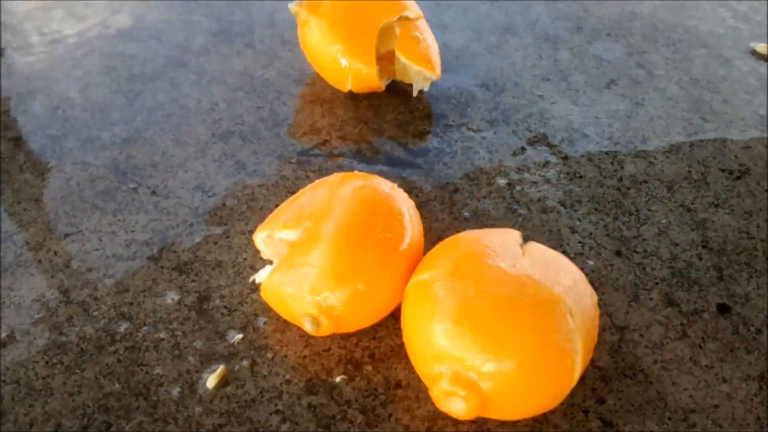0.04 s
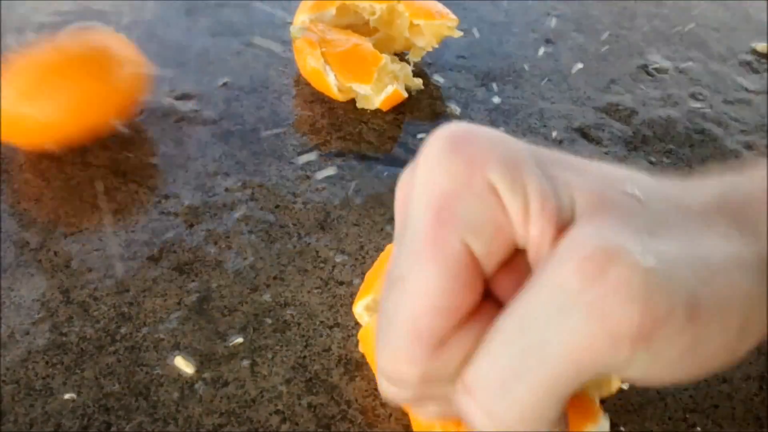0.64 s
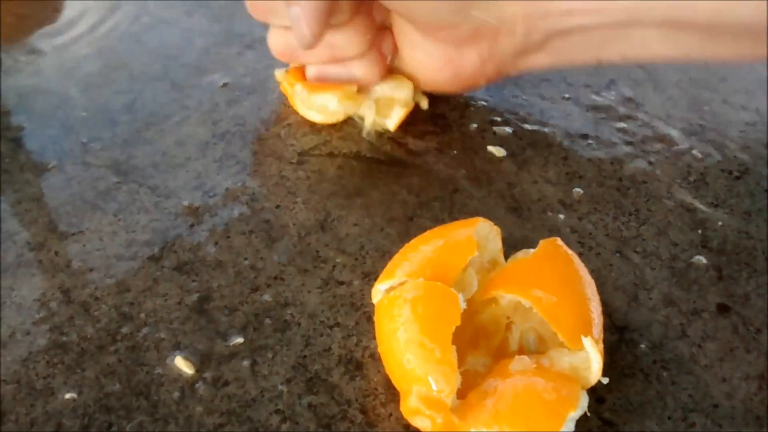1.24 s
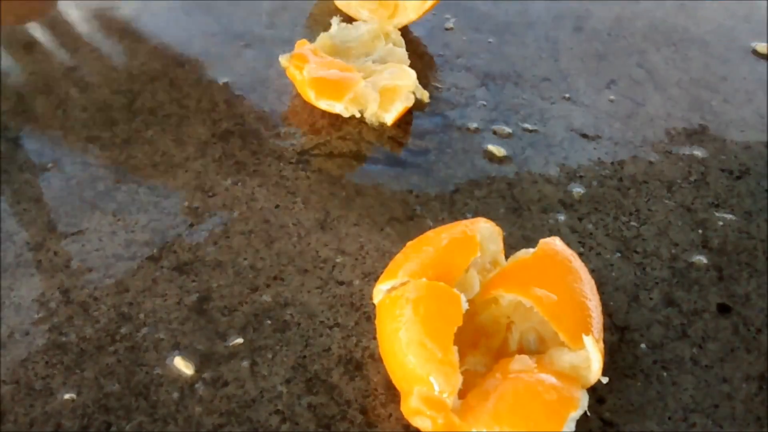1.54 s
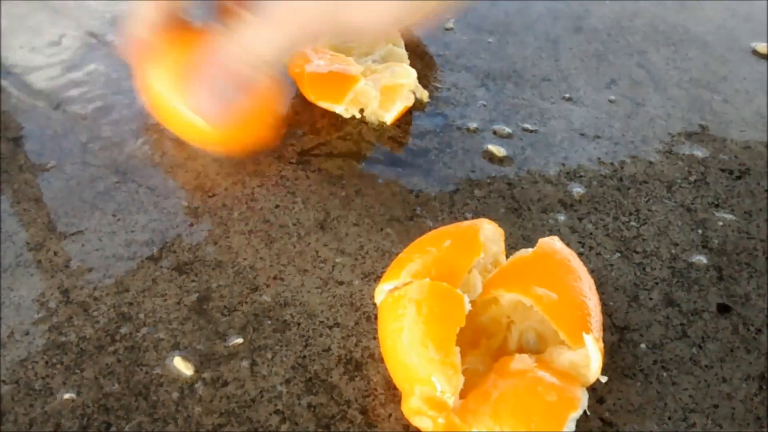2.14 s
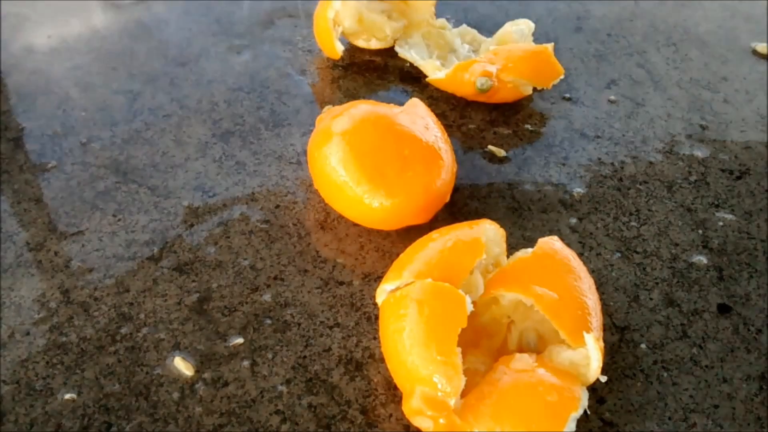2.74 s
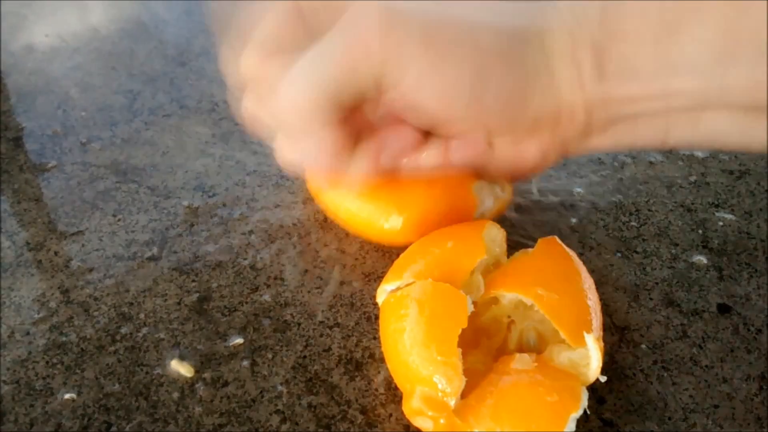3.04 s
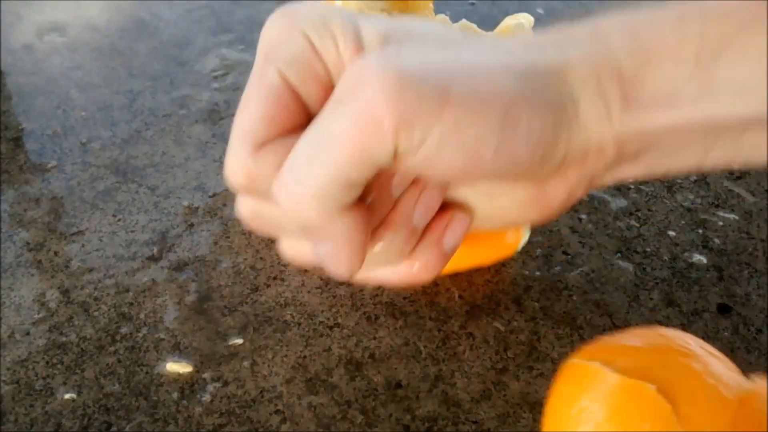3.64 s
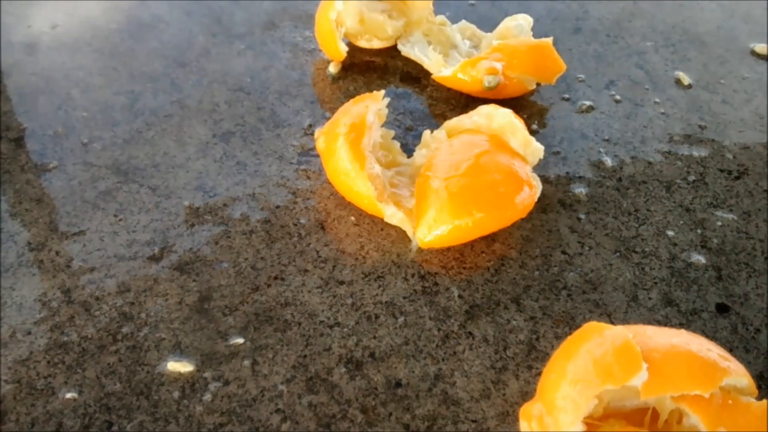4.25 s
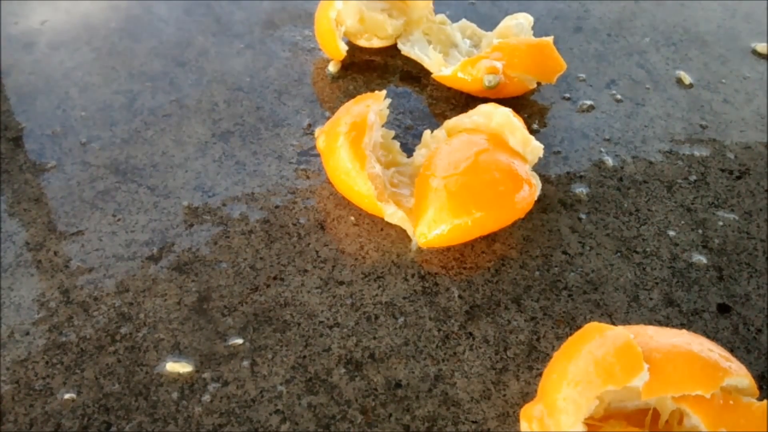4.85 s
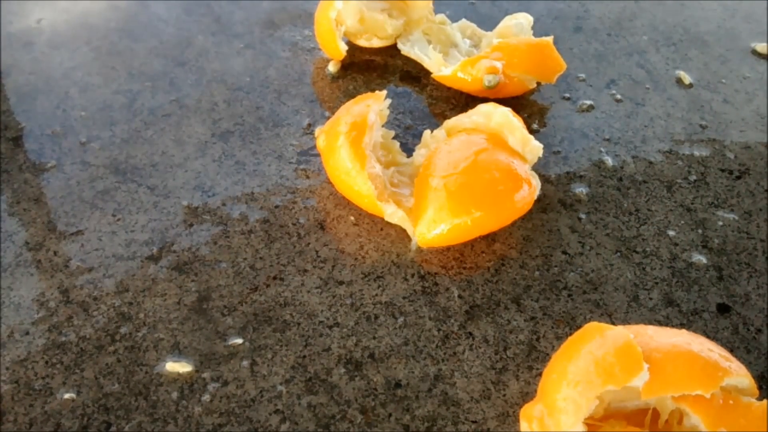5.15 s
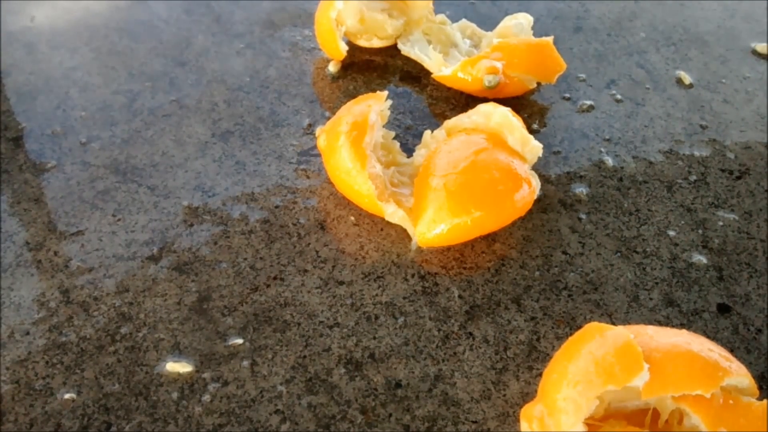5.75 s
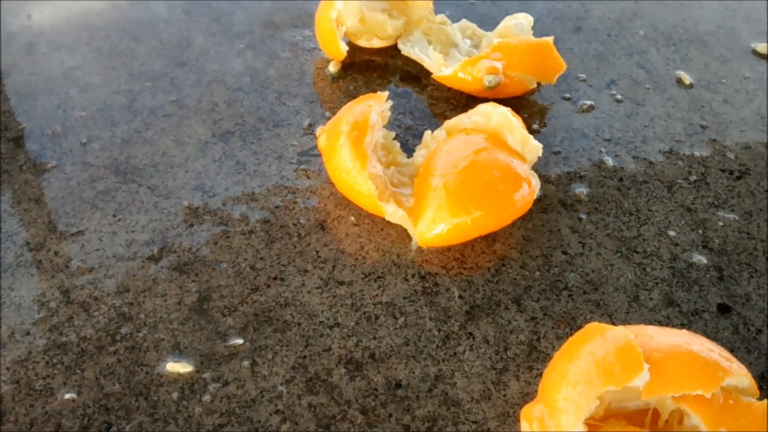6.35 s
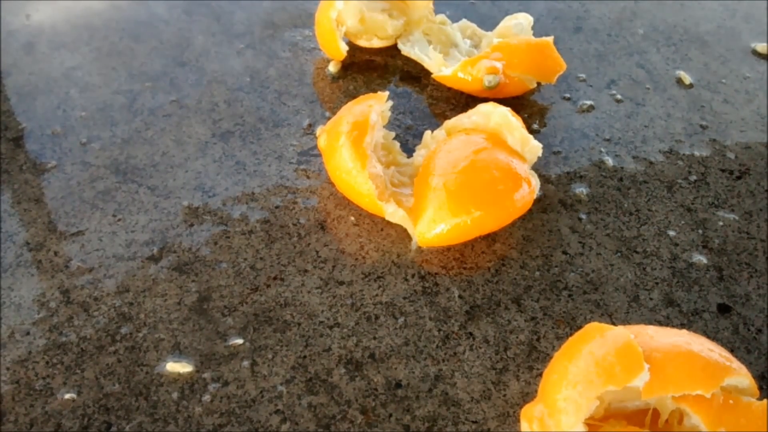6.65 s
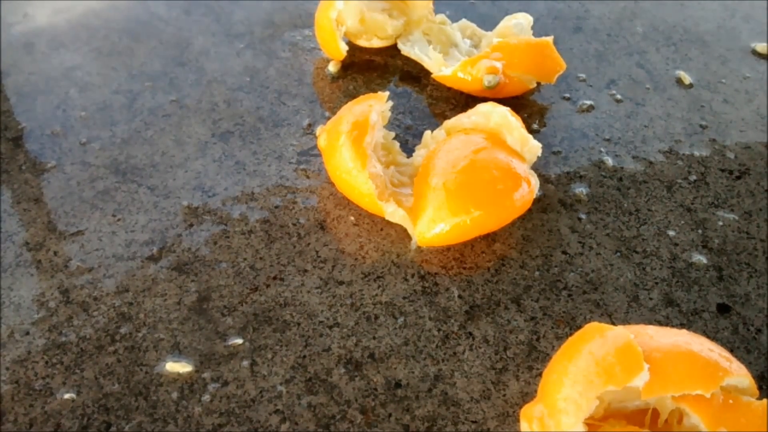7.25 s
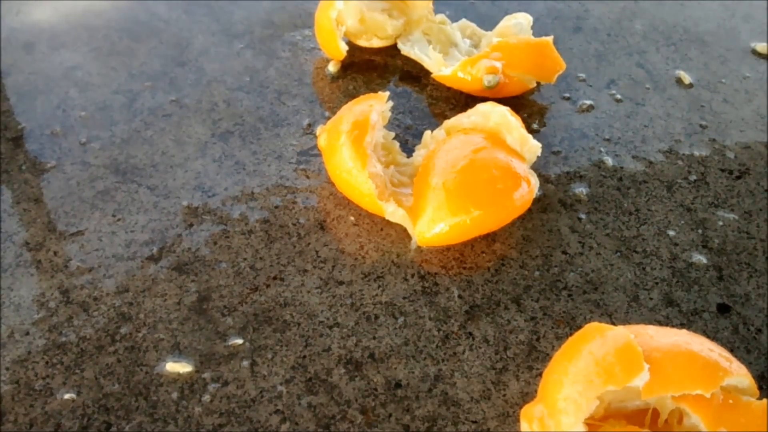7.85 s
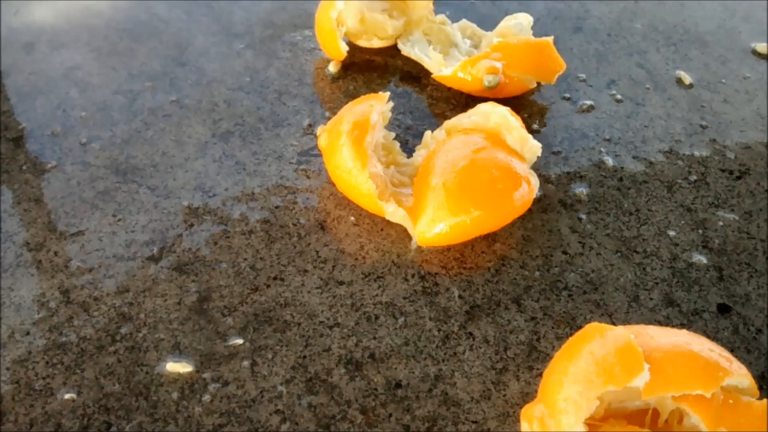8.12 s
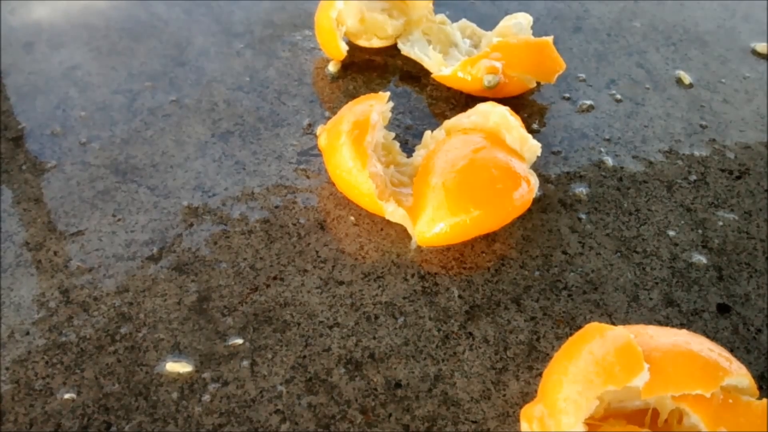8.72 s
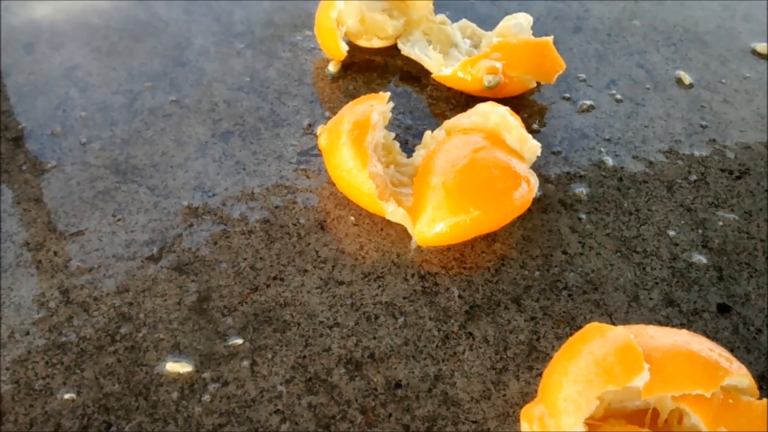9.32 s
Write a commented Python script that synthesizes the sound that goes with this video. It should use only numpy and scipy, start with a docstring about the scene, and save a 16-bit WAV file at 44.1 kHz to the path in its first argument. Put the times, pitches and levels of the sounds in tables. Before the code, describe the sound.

A bare fist smashes oranges on wet pavement, close to the microphone. Three short, sharp, wet hits land at about 0.2, 0.6 and 1.3 seconds, each with a snap of peel, a squelch of pulp and a few drops of juice. A sleeve swishes softly around 2 to 2.7 seconds as distant traffic swells into a low, steady wash. The loudest splat comes at 3.2 seconds and another at 3.7, both with juice squirting and pattering down. A very faint, thin, high squeal follows from 4 to nearly 5 seconds. Wind, light at first, then takes over, buffeting the microphone with low rumbles and thumps, strongest from 5.3 to 6 seconds, from 7.4 to 8.6, and again just after 9. A small, distant bird chirps very faintly around 6 and 9 seconds.

```python
"""Smashing lemons on wet pavement

A bare fist comes down five times, close to a phone: peel snaps, pulp squelches, juice patters down.
A sleeve swishes as the hand sets down the next fruit. Far traffic swells behind, something squeals
thinly, a small bird chirps, and gusts buffet the microphones more and more.
The hardest hits make the phone's limiter duck everything for a moment."""
import sys
import numpy as np
from scipy import signal
from scipy.fft import rfft, irfft, next_fast_len
from scipy.io import wavfile
from scipy.ndimage import uniform_filter1d, map_coordinates

SR = 44100
rng = np.random.default_rng(int(sys.argv[2]) if len(sys.argv) > 2 else 0)


def transcribe(u):
    """Save the signal u as a 16-bit wav file named by the first command-line argument.

    u: samples, shape (n,) or (channels, n), limited to [-1, 1]; the rate is SR.
    q: integer samples, one column per channel.
    """
    v = np.clip(np.atleast_2d(u).T, -1, 1)
    q = np.round(v * 32767).astype(np.int16)
    wavfile.write(sys.argv[1], SR, q)


N = 413658
TIME = np.arange(N) / SR


def from_db(db):
    """Decibels to gain."""
    return 10 ** (np.asarray(db) / 20)


def unit_rms(x):
    """Scale to rms 1."""
    return x / np.sqrt(np.mean(x ** 2) + 1e-20)


def automation(points):
    """Join (seconds, value) points into a curve over the whole scene."""
    return np.interp(TIME, *np.transpose(points))


def swell(peak_s, width_s):
    """A bell-shaped rise and fall, 1 on top."""
    return np.exp(-np.minimum(((TIME - peak_s) / width_s) ** 2, 20))


def held(start, length, attack_s=0.013, release_share=0.22):
    """Come in quickly, hold at 1, fade over the last part."""
    fade_in = (TIME - start) / attack_s
    fade_out = (start + length - TIME) / (release_share * length)
    return np.clip(np.minimum(fade_in, fade_out), 0, 1)


def at_hz(points, hz):
    """Read a curve on a log-frequency axis."""
    point_hz, value = np.transpose(points)
    return np.interp(np.log(np.maximum(hz, 1)), np.log(point_hz), value)


def band(x, low_hz, high_hz, order=2):
    """Causal band-pass."""
    edges = np.clip([low_hz, high_hz], 10, .45 * SR)
    return signal.sosfilt(signal.butter(order, edges, "band", fs=SR, output="sos"), x)


def resonate(x, hz, q):
    """A damped resonance with gain 1 on top."""
    return signal.lfilter(*signal.iirpeak(min(hz, SR / 3), max(q, 1), fs=SR), x)


def drift(per_s, size=N, step=12):
    """A smooth random wobble, rms 1."""
    knots = rng.standard_normal(int(size / SR * per_s) + 4)
    at = np.arange(0, size + step, step)
    curve = map_coordinates(knots, [at * per_s / SR], order=3, mode="nearest")
    return np.interp(np.arange(size), at, unit_rms(curve))


def narrow_band(hz, per_s):
    """Noise gathered closely around a pitch."""
    phase = 2 * np.pi * np.cumsum(hz * np.ones(N)) / SR
    return drift(per_s) * np.cos(phase) + drift(per_s) * np.sin(phase)


def stereo(two, coherence):
    """Mix two unrelated signals as mid and side: coherence 1 is mono, 0 wide, -1 out of phase."""
    mid = np.sqrt(1 + coherence) * two[0]
    side = np.sqrt(1 - coherence) * two[1]
    return np.array([mid + side, mid - side]) / np.sqrt(2)


def noise(spectrum, coherence):
    """Stereo noise at rms 1, shaped by (Hz, dB) and (Hz, coherence) points."""
    size = next_fast_len(N)
    hz = np.arange(size // 2 + 1) * SR / size
    white = stereo(rfft(rng.standard_normal((2, size))), at_hz(coherence, hz))
    return unit_rms(irfft(white * from_db(at_hz(spectrum, hz)), size)[:, :N])


def noise_burst(t, t60):
    """Wide white noise that falls 60 dB in t60 seconds."""
    return rng.standard_normal((2, len(t))) * from_db(-60 * t / t60)


def grains(size, per_s, spread_db, coherence):
    """Random clicks of uneven size: juice cells bursting, droplets landing."""
    strength = from_db(spread_db * np.minimum(rng.exponential(1, (2, size)), 3))
    polarity = rng.choice([-1, 1], (2, size))
    fires = rng.random((2, size)) < per_s / SR
    return stereo(unit_rms(strength * polarity * fires), coherence) + 1e-18


def add(out, start_s, sound, pan_db=0):
    """Mix a sound in; pan is left minus right, in dB."""
    start = round(start_s * SR)
    part = (sound * from_db([[pan_db / 2], [-pan_db / 2]]))[:, :N - start]
    out[:, start:start + part.shape[1]] += part


# The five hits. Each row: burst time, squeeze before it and juice decay (t60), all in seconds,
# thud level in dB, pulp level in dB, pulp pitch in Hz, juice level in dB, juice pitch in Hz,
# then fizz level, spray level and pan, all in dB.
FIST_HITS = [(0.2066, 0.0044, 0.015, -58, -31, 1010, -32, 3200, -44.5, -60, -1),
             (0.6455, 0.0053, 0.034, -28.5, -28.5, 520, -30, 3600, -40, -59, -1.5),
             (1.2983, 0.0058, 0.03, -36, -34, 1030, -33, 3440, -33.5, -61.5, 1),
             (3.1728, 0.0056, 0.071, -20.5, -24.5, 1150, -23.5, 3960, -37, -46.5, 0.5),
             (3.6645, 0.0076, 0.047, -30, -26.5, 790, -26.5, 3800, -28.5, -50, -1.5)]


def fist_hits(lead_s=.02, level_span_s=.03, fist_damping_db_per_s=700, flight_s=0.041):
    """The fruit is squeezed, bursts and collapses; its juice rains down after a short flight."""
    out, size = np.zeros((2, N)), SR // 3
    t = np.arange(size) / SR - lead_s
    trim = np.sqrt(level_span_s * SR / size)   # each layer has the energy of level_span_s at its level
    flights = (t + lead_s) / flight_s
    for (when, squeeze, t60, thud_db, pulp_db, pulp_hz,
         juice_db, juice_hz, fizz_db, spray_db, pan_db) in FIST_HITS:
        contact = from_db(np.minimum(4.8 * (t + squeeze) / 0.002 - 3, 0))   # the fist meets the peel
        burst = contact * from_db(np.where(t < 0, 11 * t / squeeze, -60 * t / t60))
        body = burst * from_db(-fist_damping_db_per_s * np.maximum(t, 0))   # thud and pulp stop sooner
        thud = band(body * grains(size, 9600, 0.68, 0.93), 203, 950)
        cavity = resonate(body * grains(size, 7000, 3.1, 1.0), pulp_hz, q=1.1)
        pulp = band(cavity, 340, 2300)
        juice = wet_ring(burst * grains(size, 8300, 10.0, 0.17), juice_hz)
        fizz = band(burst * grains(size, 9900, 4.1, 0.067), 4800, 14200)
        for layer, db in (thud, thud_db), (pulp, pulp_db), (juice, juice_db), (fizz, fizz_db):
            add(out, when - lead_s, from_db(db) * unit_rms(layer) * trim, pan_db)
        add(out, when, from_db(spray_db) * spray(size) * flights * np.exp(1 - flights), pan_db)
    return out


def wet_ring(x, hz):
    """Small pockets of air in the juice ring in two broad groups."""
    upper_group = from_db(-5.5) * resonate(x, 1.53 * hz, q=3.4)
    return band(resonate(x, hz, q=5.4) - upper_group, 2220, 8000)


def spray(size, droplets_per_s=1800, low_hz=3090, high_hz=6850, pitches=12):
    """Tiny droplets land and ring briefly at many pitches, over a softer, unpitched patter."""
    ringing = sum(resonate(grains(size, droplets_per_s / pitches, 3.2, 0.3), hz, q=6.6) / hz
                  for hz in np.geomspace(low_hz, high_hz, pitches))
    patter = band(grains(size, 5000, 2.2, 0.3), 1300, 10000)
    return unit_rms(ringing) + from_db(-5) * unit_rms(patter)


# Knuckles slap and peel snaps. Each row: start in seconds, level in dB, pitch in Hz,
# decay (t60) in seconds, pan in dB.
PEEL_SNAPS = [(0.2022, -35, 1080, 0.0035, 2), (0.2061, -15, 1030, 0.01, 3), (0.6406, -16, 604, 0.0087, 0),
              (0.644, -17.5, 358, 0.018, 1), (0.6454, -1.5, 3180, 0.0011, 1),
              (1.2899, -22, 1490, 0.0021, -7), (1.2972, -14.5, 3550, 0.018, -4),
              (1.2993, -16, 2350, 0.0044, 3), (3.1676, -8, 1490, 0.0027, -2),
              (3.1723, 1.5, 1340, 0.0041, -1), (3.1736, -2.5, 1700, 0.0041, -9),
              (3.1755, -9, 3850, 0.008, -6), (3.657, -18, 1390, 0.0018, -8), (3.6618, -9, 785, 0.0062, 5),
              (3.665, -10.5, 2458, 0.0021, -6), (3.6664, -22, 4200, 0.01, -8)]


def peel_snaps(scatter_db=-0.5, crack_db=-12.5):
    """A pressure pulse with a bright crack rings in trapped air and scatters off hand and ground."""
    out, t = np.zeros((2, N)), np.arange(SR // 40) / SR
    for start, db, hz, t60, pan_db in PEEL_SNAPS:
        ring = np.sin(2 * np.pi * hz * t) * from_db(-60 * t / t60)
        pulse = band(ring, 170, 19000, order=1)
        scatter = wet_ring(noise_burst(t, t60=0.0015), 3090)
        crack = band(noise_burst(t, t60=0.0025), 5000, 15600)
        edge = from_db(scatter_db) * scatter / abs(scatter).max()
        edge += from_db(crack_db) * crack / abs(crack).max()
        add(out, start, from_db(db) * (pulse / pulse.max() + edge), pan_db)
    return out


# Juice and pulp squirt from under the fist. Each row: peak time in seconds, attack in seconds,
# level in dB, band centre in Hz, decay (t60) in seconds.
JUICE_SQUIRTS = [(.2095, .002, -27, 2600, 0.035), (.214, .005, -39, 10000, 0.043),
                 (.213, .003, -42, 5200, 0.07), (.263, .003, -56, 4000, .06),
                 (0.3, .004, -53.5, 4000, 0.05), (.655, .004, -31, 6200, 0.043),
                 (0.657, .005, -37, 2800, 0.081), (.687, .012, -40.5, 4100, .05),
                 (.687, .003, -44, 9500, 0.051), (.831, .012, -57, 3300, 0.1),
                 (1.2985, .003, -22, 4000, 0.014), (1.314, .004, -42.5, 4200, 0.046),
                 (1.323, .002, -54, 12000, .09), (3.17, .002, -27, 6130, .025),
                 (3.181, .005, -19, 5760, 0.025), (3.18, .003, -37, 950, 0.033),
                 (3.19, .008, -25.5, 3800, 0.046), (3.67, .003, -25, 2110, 0.069),
                 (3.697, .003, -33, 7440, 0.032), (3.696, .004, -35, 2640, 0.05)]


def juice_squirts(cells_per_s=6000):
    """Each swells and dies as a dense run of bursting cells, coloured by the gap it escapes through."""
    out, t = np.zeros((2, N)), np.arange(SR // 6) / SR
    for peak, attack, db, hz, t60 in JUICE_SQUIRTS:
        cells = resonate(grains(len(t), cells_per_s, 2.4, 0.3), hz, q=1.2)
        squelch = unit_rms(band(cells, hz / 1.6, hz * 1.64))
        flow = np.minimum(t / attack, 1) * from_db(-60 * np.maximum(t - attack, 0) / t60)
        add(out, peak - attack, from_db(db) * flow * squelch)
    return out


# Single drops and bits of pulp land. Each row: start in seconds, level in dB, starting pitch in Hz,
# decay (t60) in seconds.
JUICE_DROPS = [(0.6717, -34, 4020, .012), (.766, -45, 1040, .035), (.783, -52, 5500, 0.0073),
               (0.79, -42, 5100, 0.0067), (1.115, -47, 6700, 0.0053), (1.339, -49, 4080, .012),
               (1.411, -49, 4500, 0.0072), (1.4165, -51, 5950, 0.0071), (1.517, -51.5, 5000, .012),
               (3.1904, -20, 1310, 0.024), (3.2448, -33, 4400, .009), (3.2447, -28.5, 1410, .02),
               (3.2755, -40, 4400, 0.023), (3.2805, -38, 3500, .01), (3.2862, -27, 3470, .009),
               (3.2864, -28, 5530, 0.01), (3.2965, -40, 3534, 0.013), (3.7528, -37, 5600, 0.0065),
               (3.787, -42, 7500, .007), (3.81, -40, 4600, 0.0073)]


def juice_drops(pitch_rise_per_s=3.3, splash_db=-0.5, attack_s=0.0007):
    """Each lands with a small splash and traps a bubble whose pitch rises as it surfaces."""
    out, t = np.zeros((2, N)), np.arange(SR // 20) / SR
    for start, db, hz, t60 in JUICE_DROPS:
        bubble = np.sin(2 * np.pi * hz * t * (1 + pitch_rise_per_s * t / 2))
        splash = band(rng.standard_normal((2, len(t))), hz / 1.3, hz * 0.96, order=1)
        envelope = from_db(db - 60 * t / t60) * np.minimum(t / attack_s, 1)
        add(out, start, envelope * (bubble + from_db(splash_db) * unit_rms(splash)))
    return out


def close_up(x):
    """Sound from just below the phone: brighter at the left port, harder and a hair later at the right."""
    left = x[0] + 0.58 * resonate(x[0], 7600, q=2.2)
    right = x[1] + 0.43 * resonate(x[1], 4240, q=2.2)
    return np.array([left, np.roll(right, 1)])


# The arm reaches in and draws back. Each row: peak time in seconds, half-width in seconds, level in dB.
ARM_MOVES = [(2.3, 0.23, -48), (2.66, 0.056, -53.5)]
# The colour of rubbing cloth. Each row: frequency in Hz, relative level in dB.
CLOTH_SPECTRUM = [(1180, -9), (2000, 0), (2620, -1.5), (3490, -3), (5190, -5), (6790, -12), (7710, -17),
                  (11100, -18), (15000, -25)]


def sleeve():
    """Cloth rubs softly and unevenly with each move of the arm."""
    motion = sum(from_db(db) * swell(peak, width) for peak, width, db in ARM_MOVES)
    roughness = from_db(1.7 * drift(39.64))
    return motion * roughness * noise(CLOTH_SPECTRUM, coherence=[(2000, 0.08), (8000, .1)])


# The light air between gusts. Each row: time in seconds, level in dB.
BREEZE_LEVELS = [(0, -52.5), (1.4, -49), (2.2, -42.5), (3.6, -45.5), (6.2, -39), (9.37, -22)]
# The gusts. Each row: peak time in seconds, half-width in seconds, level in dB,
# flutter in dB against the gust.
WIND_GUSTS = [(1.7, 0.25, -36, -30), (2.45, 0.21, -32, -38), (2.92, 0.042, -28, -34),
              (4.48, 0.085, -30, -30), (4.82, 0.38, -31.5, -34), (5.3, 0.047, -20, -18.5),
              (5.57, 0.17, -18.5, -18.5), (5.84, 0.13, -21, -19.5), (6.78, 0.3, -28.5, -28),
              (7.2, 0.16, -26.5, -13), (7.54, 0.19, -19.5, -16.5), (7.88, 0.12, -20, -23),
              (8.07, 0.042, -26, -20), (8.33, 0.052, -18, -15), (8.53, 0.15, -19.5, -16),
              (9.211, 0.06, -22.5, -9.5)]
# The colour of the wind's rumble. Each row: frequency in Hz, relative level in dB.
RUMBLE_SPECTRUM = [(15, -17.5), (40, 4.5), (90, 3), (150, -7.5), (250, -10.5), (400, -30.5), (700, -48),
                   (1500, -42), (4000, -65.5)]


def wind(breeze_swirl_db=-15.5):
    """Gusts ride on a breeze. Turbulence pushes one port as it pulls the other; small eddies flutter."""
    flow = from_db(automation(BREEZE_LEVELS))
    swirl = flow * from_db(breeze_swirl_db)
    for peak, width, db, swirl_db in WIND_GUSTS:
        gust = from_db(db) * swell(peak, width)
        flow = np.hypot(flow, gust)
        swirl = np.hypot(swirl, gust * from_db(swirl_db))
    rumble = noise(RUMBLE_SPECTRUM, coherence=[(60, -0.93), (400, -0.53)])
    rumble *= flow * from_db(2.7 * drift(45))
    flutter = noise([(80, -15), (220, 2.5), (350, -6.5), (550, -12.0), (900, -38.5), (3000, -56)],
                    coherence=[(200, -0.44), (600, 0.46)])
    flutter *= swirl * from_db(5.0 * drift(40))
    return rumble + flutter + buffets(flow)


# The biggest eddies to hit the microphones. Each row: peak time in seconds, level in dB, pitch in Hz.
BIG_EDDIES = [(5.295, -17, 140), (5.316, -8, 156), (5.534, -5.5, 159), (5.558, 0, 95), (5.577, -7, 212),
              (5.628, -6, 131), (5.635, -0.5, 171), (5.692, -3, 90), (5.752, -11, 169), (5.845, -6, 150),
              (5.887, -10, 140), (7.403, -7, 200), (7.468, -13, 220), (7.527, -5, 90), (7.586, -7, 90),
              (7.608, -5, 120), (7.841, -8, 170), (8.299, -8, 260), (8.309, -6, 220), (8.354, -10, 170),
              (8.362, 5.5, 184), (8.373, -2.5, 327), (8.418, -12, 278), (8.452, -7, 199),
              (8.484, -8.5, 278), (8.527, -14, 290), (8.546, -6.5, 320), (8.789, -11.5, 260),
              (9.098, -7.5, 234), (9.151, -10, 69), (9.233, -5, 205), (9.24, 2.5, 262), (9.249, -1, 223)]


def buffets(flow, right_lag_s=0.00034, right_db=-2.5):
    """Each eddy thumps with a pointed swing of pressure: reversed, later and weaker at the right port."""
    out, around_peak = np.zeros((2, N)), np.arange(-SR // 30, SR // 30) / SR
    t = np.array([around_peak, around_peak - right_lag_s])
    ports = np.array([[1], [-from_db(right_db)]])
    for peak, db, hz in BIG_EDDIES + small_eddies(flow):
        envelope = np.exp(-2.6 * (np.hypot(hz * t, .08) - .08))
        thump = np.cos(2 * np.pi * hz * t) * envelope
        add(out, max(peak + around_peak[0], 0), from_db(db) * thump * ports)
    return out


def small_eddies(flow, per_s=8, over_flow_db=5, centre_hz=202, candidates=200):
    """Eddies at random moments, scaled by the wind that carries them; faster ones are weaker."""
    eddies = []
    for position, speed, chance in rng.random((candidates, 3)):
        if chance < per_s * TIME[-1] / candidates:
            db = 20 * np.log10(flow[int(position * N)]) + over_flow_db - 8 * speed
            hz = centre_hz * 2 ** (2.9 * (speed - .5))
            eddies.append((position * TIME[-1], db, hz))
    return eddies


# The rise and fall of the traffic. Each row: time in seconds, relative level in dB.
TRAFFIC_LEVELS = [(0, -61), (.4, -55), (1, -56), (1.45, -51), (2.25, -42.5), (3.1, -43), (4.3, -42.5),
                  (6.3, -43.5), (7.2, -43), (8, -45), (9.37, -45.5)]
# Passing cars. Each row: nearest moment in seconds, half-width in seconds, tyre pitch in Hz,
# level in dB against the roar.
PASSING_CARS = [(.3, 1, 947, -10.5), (1.95, 0.73, 1074, -12.5), (5.25, 0.68, 727.3, -8.5),
                (7.2, 0.43, 931, -12)]
# The colours of the roar and of the hiss above it. Each row: frequency in Hz, relative level in dB.
ROAR_SPECTRUM = [(30, 2.5), (80, 7.5), (160, 5), (300, -0.5), (550, -2), (950, -3), (1300, -11),
                 (1700, -15), (2400, -24), (3600, -27), (5000, -36), (9000, -40.5)]
STREET_HISS_SPECTRUM = [(1000, 9), (3500, 4.5), (6000, -0.5), (10000, -1.5), (15000, -3)]
# The roar's stereo image. Each row: frequency in Hz, coherence from 0 (wide) to 1 (mono).
ROAR_COHERENCE = [(60, 0.48), (200, 0.6), (600, 0.8), (1200, 0.76), (2200, 0.017), (3800, 0.081),
                  (8000, .1)]


def traffic():
    """Far traffic roars and each car's tyres sing in a narrow band; a fine hiss swells along."""
    level_db = automation(TRAFFIC_LEVELS)
    tyres = sum(from_db(db) * swell(nearest, width) * narrow_band(hz, 230)
                for nearest, width, hz, db in PASSING_CARS)
    roar_gain = from_db(level_db + 6.5 + 0.57 * drift(14))
    roar = noise(ROAR_SPECTRUM, ROAR_COHERENCE)
    hiss = noise(STREET_HISS_SPECTRUM, coherence=[(1000, 0.086), (15000, 0)])
    return roar_gain * (roar + tyres) + from_db(0.51 * level_db - 36.0) * hiss


def vehicle_hum(hz=538, db=-50, nearest_s=2.43, half_width_s=0.7):
    """One distant vehicle hums faintly, on a nearly steady pitch, as it goes by."""
    pitch = hz * (1 + .003 * drift(10.5))
    hum = np.sin(2 * np.pi * np.cumsum(pitch) / SR)
    return hum * from_db(db + 2.5 * drift(9.5)) * swell(nearest_s, half_width_s)


# The bird's calls. Each row: start in seconds, length in seconds, first and last pitch in Hz,
# level in dB, rasp from 0 to 1.
BIRD_CHIRPS = [(5.843, 0.075, 3140, 3280, -61, 0.6), (5.98, 0.062, 3020, 2900, -57, 0.5),
               (8.8, 0.06, 2900, 3260, -56, 0.3), (8.925, 0.079, 3030, 2860, -55, 0.35),
               (9.137, 0.093, 3560, 3490, -58, 0.97)]


def bird(pan_db=-4, echo_db=2, echo_t60_s=0.22, rasp_per_s=600):
    """Thin chirps far off to the right, some gliding, some raspy, blurred by the street's echoes."""
    out, t = np.zeros((2, N)), np.arange(SR // 5) / SR
    echoes = from_db(echo_db) * unit_rms(noise_burst(t, echo_t60_s)) / np.sqrt(len(t))
    for start, length, first_hz, last_hz, db, rasp in BIRD_CHIRPS:
        size = int(length * SR)
        hz = np.linspace(first_hz, last_hz, size) * (1 + rasp * .055 * drift(rasp_per_s, size))
        tremor = unit_rms(1 + rasp * drift(rasp_per_s, size))
        whistle = np.sin(2 * np.pi * np.cumsum(hz) / SR)
        chirp = from_db(db) * tremor * whistle * np.sqrt(np.hanning(size))
        add(out, start, chirp, pan_db)
        add(out, start, signal.fftconvolve(echoes, chirp[None]))
    return out


# A thin squeal, perhaps far brakes. Each row: start in seconds, length in seconds,
# starting pitch in Hz, level in dB.
SQUEAL_NOTES = [(3.925, 0.082, 5020, -62), (3.965, .045, 3350, -60), (4.076, 0.64, 3270, -64.5),
                (4.1, 0.58, 5000, -69)]
# The colour of the hiss around it. Each row: frequency in Hz, relative level in dB.
SQUEAL_HISS_SPECTRUM = [(1200, -19.5), (2300, 3), (3800, 3), (5500, -4), (7000, -8), (9000, -20),
                        (15000, -23)]


def squeal(pan_db=-3, sag_per_s=0.031, flicker_db=1.0, hiss_db=-60.5):
    """Two unsteady high tones catch briefly, break off, then waver and sag slowly inside a soft hiss."""
    out = np.zeros((2, N))
    waver = 1 + .004 * drift(22)
    for start, length, hz, db in SQUEAL_NOTES:
        envelope = from_db(db + flicker_db * drift(18)) * held(start, length)
        pitch = hz * waver * (1 - sag_per_s * (TIME - start))
        add(out, 0, envelope * narrow_band(pitch, 110), pan_db)
    hiss = noise(SQUEAL_HISS_SPECTRUM, coherence=[(2000, 0.2), (8000, .1)])
    add(out, 0, from_db(hiss_db) * held(start=3.95, length=0.83) * hiss, pan_db)
    return out


def scene():
    """Fruit and arm in front, wind on the microphones, bird and street behind."""
    lemons = close_up(fist_hits() + peel_snaps() + juice_squirts() + juice_drops())
    return lemons + sleeve() + wind() + bird() + traffic() + squeal() + vehicle_hum()


def limiter(x, release_db_per_s=8.5):
    """A peak over full scale pulls the gain down at once; it creeps back at a steady rate."""
    over_db = np.maximum(20 * np.log10(abs(x).max(axis=0) + 1e-9), 0)
    recovered_db = release_db_per_s * TIME
    cut_db = np.maximum.accumulate(over_db + recovered_db) - recovered_db
    return x * from_db(-uniform_filter1d(cut_db, size=16))


def record(dry, cross_feed=.33, lag_samples=17, cutoff_hz=15400):
    """The phone widens the upper mids by inverted cross-feed, limits and rounds peaks, cuts the top."""
    upper_mids = band(dry, 900, 7000, order=1)
    opposite_side = np.pad(upper_mids[::-1], ((0, 0), (lag_samples, 0)))[:, :N]
    wide = dry - cross_feed * opposite_side
    rounded = np.tanh(limiter(wide))
    return signal.sosfilt(signal.ellip(10, .2, 80, cutoff_hz, fs=SR, output="sos"), rounded)


dry = scene()
out = record(dry)
transcribe(out)
```